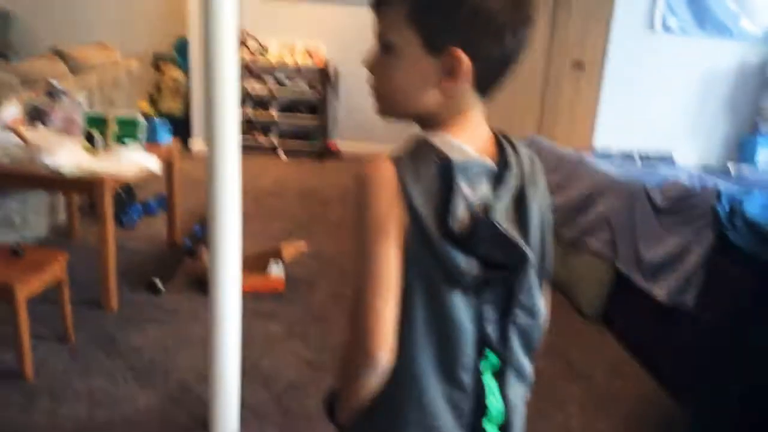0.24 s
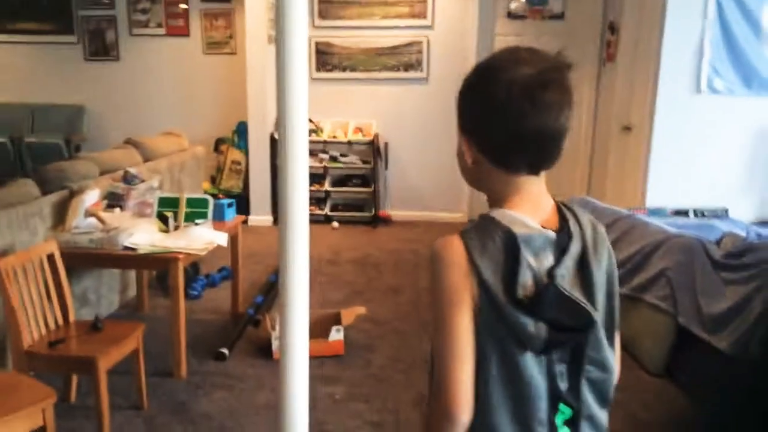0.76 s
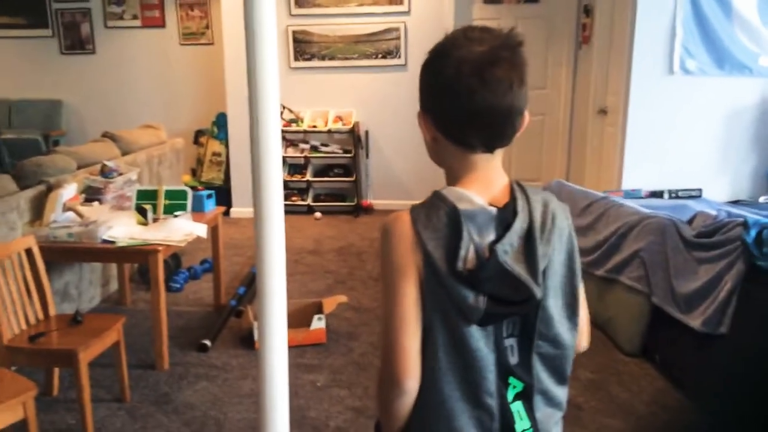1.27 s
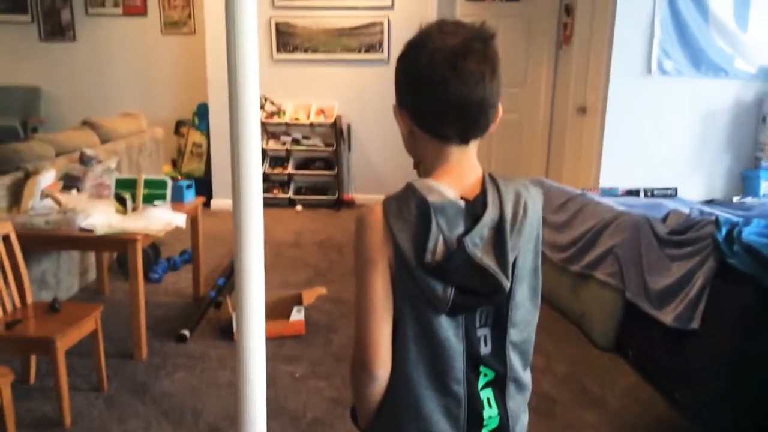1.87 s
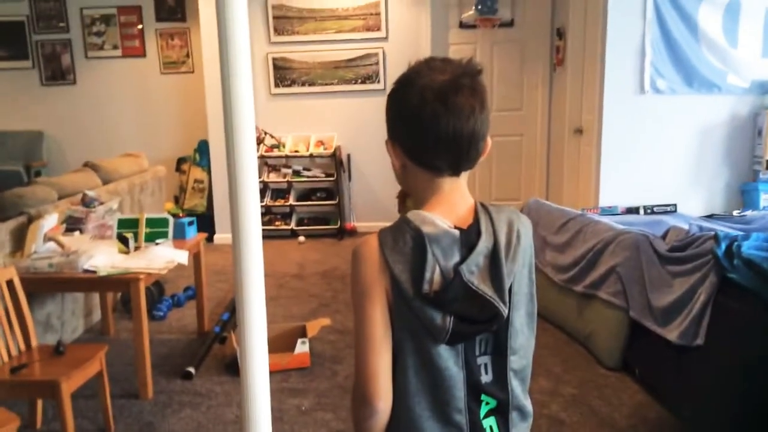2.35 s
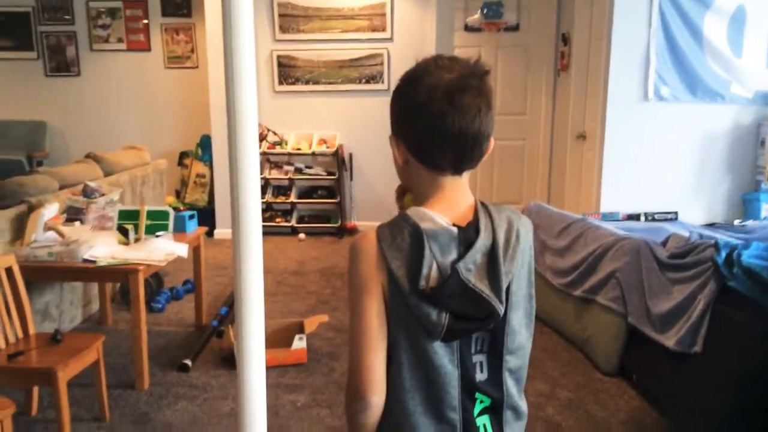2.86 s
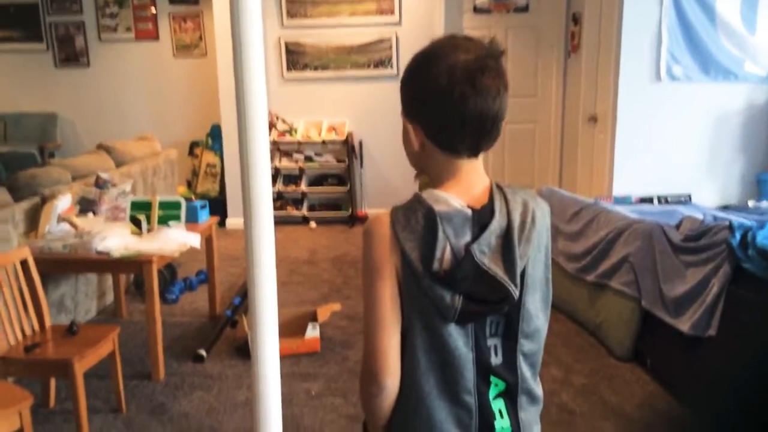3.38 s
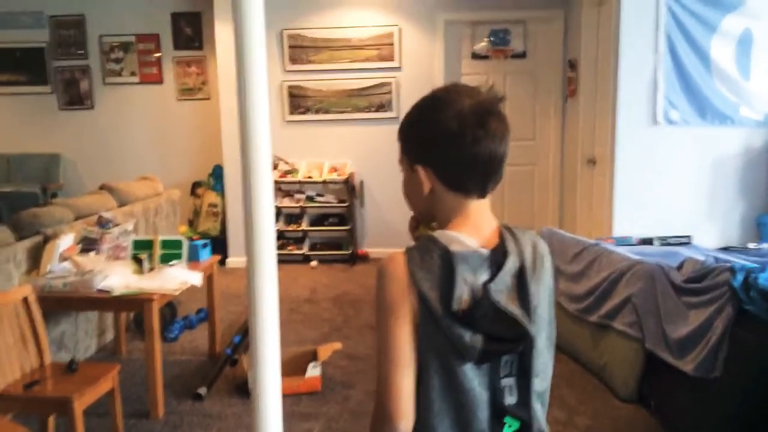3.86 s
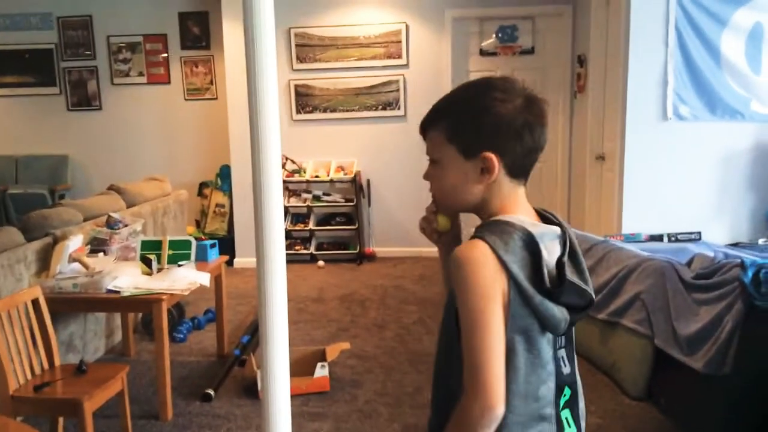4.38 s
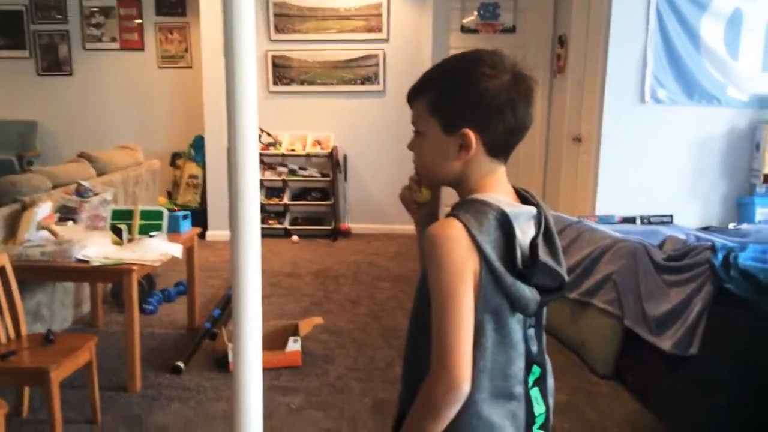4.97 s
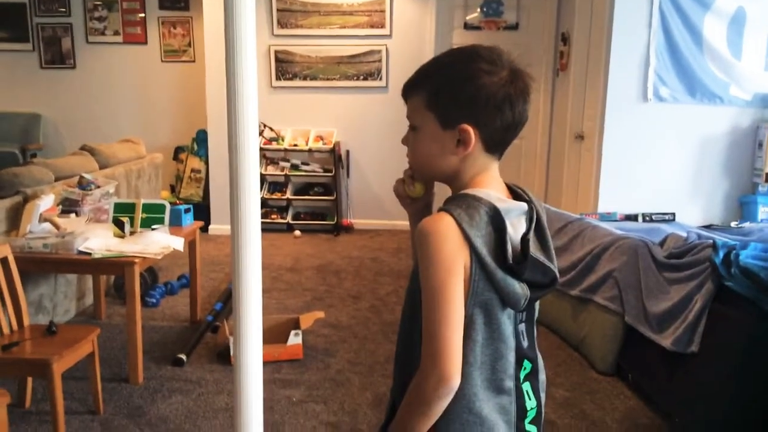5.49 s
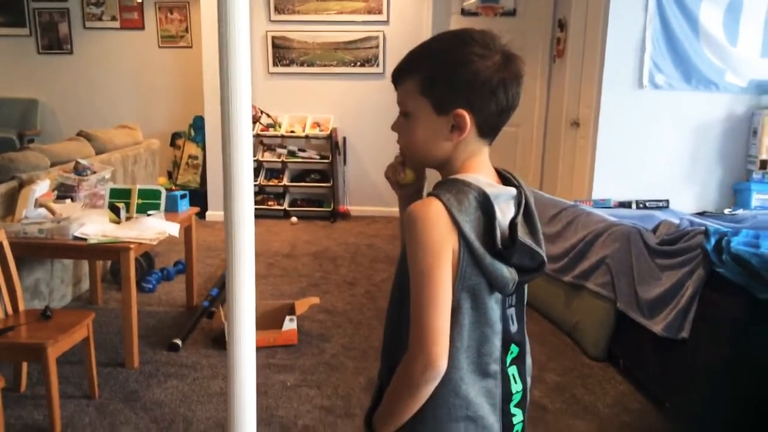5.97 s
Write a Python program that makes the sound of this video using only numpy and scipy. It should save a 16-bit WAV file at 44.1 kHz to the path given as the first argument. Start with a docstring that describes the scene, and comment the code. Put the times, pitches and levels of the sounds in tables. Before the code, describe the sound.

Close, scattered knocks, clicks and skin rubs on a hand-held camera, with one sharp snap and a heavy muffled thump over faint hiss.

```python
"""In a quiet carpeted room, fingers shift their grip on a hand-held camera.
They bump its case in dry knocks and soft thuds, and nails and casing give small sharp ticks.
In between, skin slides, rubs and peels away in many tiny slips. A cracking knock, a hard snap
and one heavy padded thump stand out. The room barely answers; under it all lie a faint
rumble, hum and hiss."""
import sys
import numpy as np
from scipy import signal
from scipy.fft import rfft, irfft, next_fast_len
from scipy.io import wavfile

SR = 44100
rng = np.random.default_rng(int(sys.argv[2]) if len(sys.argv) > 2 else 0)


def persist_wave(psi):
    """Save psi, clipped to +-1, as 16-bit WAV."""
    counts = np.round(np.clip(psi, -1, 1) * 32767).astype(np.int16)
    wavfile.write(sys.argv[1], SR, np.atleast_2d(counts).T)


N = 274787
HIT_SAMPLES = 2048  # room for one short hit
FREQS_HZ = np.fft.rfftfreq(HIT_SAMPLES, 1 / SR) + 1

# Knocks on the case. Each row: start in seconds, level in dB before the boost, bass edge in Hz,
# treble edge in Hz. The sound is strongest between the edges; a harder touch has a higher treble edge.
KNOCKS = [(.0793, -31, 600, 1100), (.2140, -38, 600, 1800), (.3795, -22, 400, 650), (.3936, -4.5, 720, 620),
          (.3942, -8.5, 1700, 2400), (.4005, -25, 400, 700), (.6744, -12, 90, 1200), (.7360, -29, 80, 450),
          (.7388, -26, 600, 850), (.8658, -33, 1200, 3200), (1.1628, -28, 700, 680),
          (1.8598, -46, 140, 400), (2.1016, -46, 280, 600), (2.1172, -49, 250, 550),
          (2.1766, -50, 300, 600), (2.5935, -27, 300, 2000), (2.6116, -37, 450, 750),
          (2.7078, -27, 230, 1400), (2.7902, -43, 700, 1700), (2.8338, -42, 900, 1400),
          (2.8465, -44, 130, 300), (2.8801, -31, 350, 1500), (2.9746, -38, 500, 1900),
          (3.0612, -44, 250, 600), (3.1066, -41, 1000, 1600), (3.1669, -23.5, 200, 900),
          (3.3706, -31, 450, 1200), (3.3832, -24.5, 300, 750), (3.3920, -28, 260, 800),
          (3.4603, -32, 240, 400), (3.9166, -20, 600, 1700), (3.9182, -17.5, 110, 600),
          (3.9468, -33, 450, 1200), (3.9819, -20, 50, 600), (4.0056, -34, 700, 1700),
          (4.1248, -40, 800, 1500), (4.4118, -47, 500, 1100), (5.1132, -48, 150, 200),
          (5.2252, -45, 2200, 2600), (5.2910, -26, 500, 1100), (5.3207, -34, 2600, 1750),
          (5.3386, -38, 2600, 2050), (5.6842, -35, 1400, 580)]
# The notes the case rings with. Each row: pitch in Hz, relative level in dB, seconds to fade by 60 dB.
CASE_NOTES = [(470, 0, .045), (590, 0, .05), (850, -1, .04), (1080, -5, .03), (1620, -9, .025),
              (2150, -10, .02), (2800, -15, .015)]
# The heavy thump: time of its middle in seconds, peak in dB, bass edge in Hz, treble edge in Hz.
THUMP = (5.2793, -.1, 165, 540)
# The hard snap: start in seconds, peak in dB, treble edge in Hz.
SNAP_HIT = (3.9822, -6.3, 11500)
# The notes in the snap. Each row: pitch in Hz, relative level in dB, seconds to fade by 60 dB.
SNAP_NOTES = [(1030, -2, .020), (1220, -2, .016), (1590, -1, .014), (2130, -6, .012), (2700, -6, .012),
              (4700, -7, .004), (9900, 0, .002)]
# Ticks of nail and casing. Each row: start in seconds, peak in dB, added brightness in dB per octave.
TICKS = [(.1020, -33, 2), (.5253, -31, 2), (.6312, -25, 7), (.6708, -22, 5), (.6742, -15, 3),
         (.8660, -30, -2), (2.7098, -31, -3), (2.8802, -23, -2.5), (3.1785, -31, 2), (3.1866, -29, -1),
         (3.2053, -31, 2), (3.2499, -38, -1), (3.3768, -32, -1), (3.4047, -30, -1), (3.9094, -33, 3),
         (3.9826, -14, -.5), (4.0309, -40, 3), (4.1330, -37, 2), (4.1696, -36, 1), (4.7646, -41, 4),
         (4.8501, -37, 4), (5.9473, -41, 3), (6.0660, -37, 3)]
# The tone of a tick. Each row: frequency in Hz, relative level in dB.
TICK_TONE = [(200, -25), (1200, -5), (2800, -2), (3500, -8), (4300, -2), (5500, -1), (6400, -7), (7700, -6),
             (9000, 2), (11000, -1), (12500, -8), (14800, -11), (16000, -22)]
# Finger slides. Each row: loudest moment in seconds, rub level in dB, swell plus fade time in seconds,
# added brightness in dB per octave, crackle level in dB.
SCUFFS = [(.072, -50, .028, 1.5, -64), (.283, -54, .023, 1, -72), (.345, -52, .03, 1.5, -70),
          (.399, -35, .015, 1, -66), (.475, -48, .11, .9, -61), (.686, -42, .03, -1.5, -70),
          (.742, -41, .017, -3, -76), (.835, -53, .07, .5, -67), (1.164, -51, .026, 0, -68),
          (1.720, -59, .04, 1, -70), (2.597, -48, .021, 1, -74), (2.708, -49, .012, 1, -68),
          (2.879, -48, .032, 0, -62), (3.184, -50, .044, 2, -51), (3.386, -37.5, .026, .3, -58),
          (3.900, -45, .01, 1.5, -70), (3.921, -43, .02, 1.5, -67), (3.950, -44, .026, 2, -65),
          (3.985, -44, .028, 2.5, -55), (4.130, -52, .025, 2, -65), (4.243, -56, .023, 4, -58),
          (4.575, -59, .055, 1, -72), (5.281, -39, .024, -11, -78), (5.275, -55, .14, -4.5, -78)]
# How the grip rubs. Each row: time in seconds, relative pressing level in dB, relative crackle in dB.
GRIP = [(0.0, -67, -74), (0.1, -68, -74), (0.28, -60, -73), (0.59, -57, -67), (0.73, -58, -69),
        (0.88, -67, -74), (1.28, -74, -77), (2.03, -71, -76), (2.48, -73, -76), (3.3, -63, -73),
        (3.63, -73, -76), (3.92, -73, -77), (4.09, -65, -74), (4.34, -69, -77), (4.87, -72, -75),
        (5.27, -64, -73), (5.46, -75, -75), (6.23, -74, -77)]
# The tone of rubbing heard through the case. Each row: frequency in Hz, relative level in dB.
RUB_TONE = [(30, -32), (70, -10), (160, -7), (280, -8), (430, -1), (560, 2), (750, -3), (1000, -4),
            (1400, -11), (2200, -11), (2900, -15), (3500, -24), (5200, -23), (12000, -38)]
# Runs of peeling skin. Each row: start in seconds, end in seconds, average level in dB.
PEELS = [(.46, .56, -57), (4.12, 4.27, -64), (5.04, 5.22, -67), (5.39, 5.55, -68), (5.61, 5.87, -72),
         (6.02, 6.12, -68)]
# How long the room echoes. Each row: frequency in Hz, seconds to fade by 60 dB.
ROOM_FADE = [(100, .5), (600, .5), (2500, .4), (12000, .2)]
# The tone of the still room and microphone hiss. Each row: frequency in Hz, relative level in dB.
AIR_TONE = [(15, -35), (25, -5), (64, 1), (108, -4), (301, -4), (754, -13), (1400, -15), (1790, -13),
            (2110, -17), (3820, -20), (5430, -17), (7110, -23), (10700, -16), (14800, -26), (16000, -35)]


def knocks(bass_slope=2.1, treble_slope=4.4, leak_db=-45, push_db=-24, boost_db=1):
    """Each touch is a brief push on the case, which rings a little, differently from spot to spot."""
    out, t = np.zeros(N), np.arange(HIT_SAMPLES) / SR
    note_hz, note_db, fade_s = np.transpose(CASE_NOTES)[:, :, None]
    fading = amp(note_db - 60 * t / fade_s)
    spots = rng.standard_normal(size=(200, 2, len(CASE_NOTES), 1))
    for (s, db, bass_hz, treble_hz), (louder, detune) in zip(list(KNOCKS) + nudges(), spots):
        bass_cut = roll_off(bass_hz / FREQS_HZ, bass_slope) + amp(push_db) * FREQS_HZ / (FREQS_HZ + 90)
        treble_cut = roll_off(FREQS_HZ / treble_hz, treble_slope) + amp(leak_db) / (1 + FREQS_HZ / 3000)
        push = peak_to_one(pulse(bass_cut * treble_cut))
        notes = fading * amp(2.5 * louder) * np.sin(2 * np.pi * note_hz * (1 + .03 * detune) * t)
        ring = peak_to_one(signal.fftconvolve(push, notes.sum(0))[:HIT_SAMPLES])
        # A fleshy touch (low bass edge) or a firm one rings less than a middling knock (400 Hz, -35 dB).
        ring_db = -12.5 + 2 * np.log2(bass_hz / 400) - .15 * (db + 35)
        add(out, s, amp(db + boost_db) * peak_to_one(push + amp(ring_db) * ring))
    return out


def nudges(per_s=9, rest_db=-72.5, spread_db=3, bass_hz=330, treble_hz=900):
    """Rows of faint extra knocks, at chance moments while the grip presses harder than at rest."""
    delay, strength, hardness = rng.random((120, 3)).T
    s = (np.arange(len(delay)) + delay) / per_s
    press_db = np.interp(s, *np.transpose(GRIP)[:2]) - rest_db
    db = -54 + .9 * press_db + spread_db * (2 * strength - 1)
    shift = 2 ** (2 * hardness - 1)  # up to an octave either way
    rows = np.transpose([s, db, bass_hz * shift, treble_hz * shift])
    return list(rows[(press_db > 0) & (s < N / SR)])


def thump(bass_slope=1.8, treble_slope=6, pad_hz=150, leak_db=-35, phase_radians=.25):
    """A padded blow by the microphone: a smooth bump of pressure between two shallow dips."""
    s, db, bass_hz, treble_hz = THUMP
    bass_cut = roll_off(bass_hz / FREQS_HZ, bass_slope)
    treble_cut = roll_off(FREQS_HZ / treble_hz, treble_slope) + amp(leak_db) / (1 + (FREQS_HZ / 2500) ** 4)
    padding = roll_off(FREQS_HZ / pad_hz, 1)
    bump = np.fft.fftshift(irfft(bass_cut * treble_cut * padding * np.exp(1j * phase_radians)))
    out = np.zeros(N)
    add(out, s - HIT_SAMPLES / 2 / SR, amp(db) * peak_to_one(bump))
    return out


def snap(lowest_hz=900):
    """The case snaps against its seat: stiff notes that die at once, from a part too small for bass."""
    out, t = np.zeros(N), np.arange(HIT_SAMPLES) / SR
    s, db, treble_hz = SNAP_HIT
    clack = sum((-1) ** k * amp(note_db - 60 * t / fade_s) * np.sin(2 * np.pi * hz * t)
                for k, (hz, note_db, fade_s) in enumerate(SNAP_NOTES))
    band = signal.butter(4, [lowest_hz, treble_hz], "bandpass", fs=SR, output="sos")
    add(out, s, amp(db) * peak_to_one(signal.sosfilt(band, clack)))
    return out


def ticks(chatter_db=-17, chatter_s=.0009):
    """A hard slip, then a millisecond of chatter as the surfaces settle."""
    out, t = np.zeros(N), np.arange(HIT_SAMPLES) / SR
    octaves_up = np.log2(np.maximum(FREQS_HZ, 1000) / 1000)
    for s, db, brightness in TICKS:
        slip = amp(chatter_db) * rng.standard_normal(HIT_SAMPLES) * np.exp(-t / chatter_s)
        slip[0] = 1  # the hard slip itself
        click = pulse(amp(look_up(TICK_TONE, FREQS_HZ) + brightness * octaves_up))
        add(out, s, amp(db) * peak_to_one(signal.fftconvolve(slip, click)[:HIT_SAMPLES]))
    return out


def scuffs(slips_per_s=2000, crackles_per_s=900, swell_share=.48):
    """A finger slides a short way: a dense run of tiny slips that swells and dies."""
    out, t = np.zeros(N), np.arange(-SR // 5, SR // 5) / SR
    for s, db, length_s, brightness, crackle_db in SCUFFS:
        rise_s, fall_s = length_s * swell_share, length_s * (1 - swell_share)
        speed = np.exp(np.minimum(t / rise_s, -t / fall_s)) * signal.windows.tukey(len(t), .2)
        rub = with_tone(clicks(slips_per_s, len(t), spread_db=3.5), tilted(RUB_TONE, brightness))
        crackle = with_tone(clicks(crackles_per_s, len(t), spread_db=5.5), tilted(TICK_TONE, -.5))
        add(out, s + t[0], speed * (amp(db) * rub + amp(crackle_db) * crackle))
    return out


def rubbing(dull_trim_db=-4.7, crackle_trim_db=-4.3, uneven_db=2.2, pads_db=-74.5):
    """The resting grip creeps in small slips: dull ones through the case, dry ones as fine crackle."""
    s, press_db, crackle_db = np.transpose(GRIP)
    t = np.arange(N) / SR
    sticking_db = uneven_db * wander(60, t)
    dull = with_tone(clicks(700, N, spread_db=4.5), RUB_TONE)
    dull *= amp(np.interp(t, s, press_db) + dull_trim_db + sticking_db)
    crackle = with_tone(clicks(500, N, spread_db=5.5), tilted(TICK_TONE, 3))
    crackle *= amp(np.interp(t, s, crackle_db) + crackle_trim_db + sticking_db)
    # The soft finger pads shift all the time, in faint low bumps.
    pad_tone = [(30, -25), (150, 0), (400, -8), (1200, -28), (5000, -60)]
    pads = with_tone(clicks(70, N, spread_db=3), pad_tone)
    return dull + crackle + amp(pads_db) * pads


def peeling(per_s=170, db_per_octave=7):
    """Skin lifts from the case in runs of tiny, very bright clicks."""
    out = np.zeros(N)
    for start, end, db in PEELS:
        size = round((end - start) * SR)
        run = clicks(per_s, size, spread_db=5) * signal.windows.tukey(size, .2)
        add(out, start, amp(db) * with_tone(run, tilted(TICK_TONE, db_per_octave)))
    return out


def room_echo(x):
    """The room answers with a short, smooth tail; the small case sends little bass into it."""
    hz, t, noise = signal.stft(rng.standard_normal(SR // 2), SR, nperseg=256)
    sent_tone = [(100, -16), (250, -10), (550, 0), (1200, -5), (3000, -8), (10000, -12)]
    tail_db = look_up(sent_tone, hz)[:, None] - 60 * t / look_up(ROOM_FADE, hz)[:, None]
    tail = signal.istft(noise * amp(tail_db), SR, nperseg=256)[1]
    return signal.fftconvolve(x, tail / np.linalg.norm(tail))[:N]


def air(noise_db=-70.5, hum_hz=60, hum_db=-82):
    """Low room rumble, faint mains hum and microphone hiss."""
    hum = amp(hum_db) * average_to_one(np.sin(2 * np.pi * hum_hz * np.arange(N) / SR))
    return amp(noise_db) * with_tone(rng.standard_normal(N), AIR_TONE) + hum


def amp(db):
    """Turns decibels into a number to multiply by."""
    return 10 ** (np.asarray(db) / 20)


def average_to_one(x):
    """Scales a sound so that its average strength (rms) is 1."""
    return x / np.sqrt(np.mean(x ** 2) + 1e-20)


def peak_to_one(x):
    """Scales a sound so that its outline tops at 1."""
    return x / abs(signal.hilbert(x)).max()


def roll_off(ratio, slope):
    """A gain near 1 for small ratios that falls once the ratio passes 1."""
    return 1 / np.sqrt(1 + ratio ** (2 * slope))


def look_up(table, hz):
    """Reads between the rows of a frequency table."""
    row_hz, value = np.transpose(table)
    return np.interp(np.log(hz + 1), np.log(row_hz + 1), value)


def tilted(tone, db_per_octave):
    """The same tone made brighter, or duller if the number is negative."""
    return [(hz, db + db_per_octave * np.log2(max(hz, 200) / 1000)) for hz, db in tone]


def with_tone(x, tone):
    """Filters a sound by a tone table, to an average strength of 1."""
    size = next_fast_len(len(x), True)
    gain = np.interp(np.fft.rfftfreq(size, 1 / SR), FREQS_HZ, amp(look_up(tone, FREQS_HZ)))
    return average_to_one(irfft(rfft(x, size) * gain, size)[:len(x)])


def pulse(gain):
    """The shortest sudden pulse with this balance of frequencies."""
    log_gain = np.log(np.maximum(gain / gain.max(), 1e-4))
    mirrored = np.concatenate([log_gain, log_gain[-2:0:-1]])
    spectrum = np.exp(signal.hilbert(mirrored).conj())[:len(gain)]
    fade = np.exp(-(np.arange(HIT_SAMPLES) / 600) ** 4)
    return fade * irfft(spectrum)


def wander(rate_hz, t):
    """A curve that drifts up and down by chance."""
    points = rng.standard_normal(1000)
    return average_to_one(np.interp(t * rate_hz, np.arange(len(points)), points))


def clicks(per_s, size, spread_db):
    """Random clicks, mostly small, a few large."""
    chance, strength = rng.random((2, size))
    at, out = np.flatnonzero(chance < per_s / SR), np.zeros(size)
    click_db = spread_db * np.minimum(-np.log(1 - strength[at]), 4)
    out[at] = (-1.) ** at * amp(click_db)
    return out


def add(mix, s, sound):
    """Adds a sound to the mix, starting at s seconds."""
    start = round(s * SR)
    sound = sound[max(-start, 0):]
    part = mix[max(start, 0):][:len(sound)]
    part += sound[:len(part)]


def scene(echo_db=-45):
    """The finger sounds reach the microphone through the case, so they have almost no echo."""
    handling = knocks() + ticks() + snap() + scuffs() + rubbing() + peeling()
    return (handling + thump() + amp(echo_db) * room_echo(handling) + air())[None]


def record(dry, highest_hz=16200):
    """Flattens any peak past full scale, then cuts the very highest treble."""
    low_pass = signal.firwin(511, highest_hz, window=("kaiser", 9), fs=SR)
    return signal.oaconvolve(np.clip(dry, -1, 1), low_pass[None], "same")


dry = scene()
out = record(dry)
persist_wave(out)
```